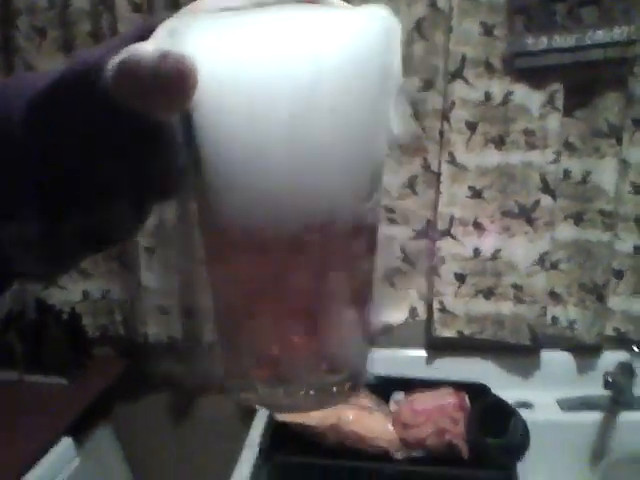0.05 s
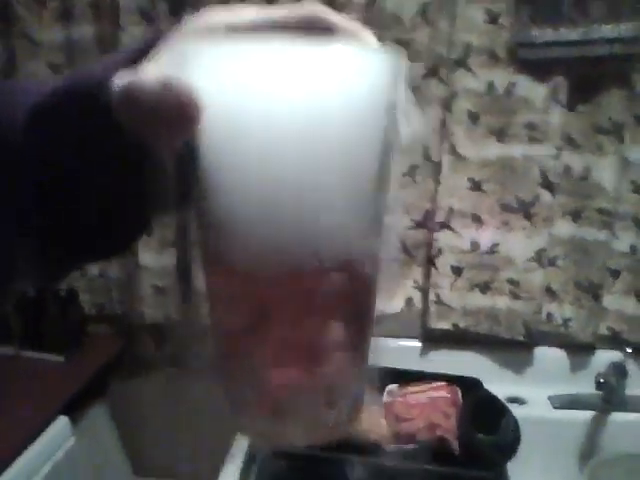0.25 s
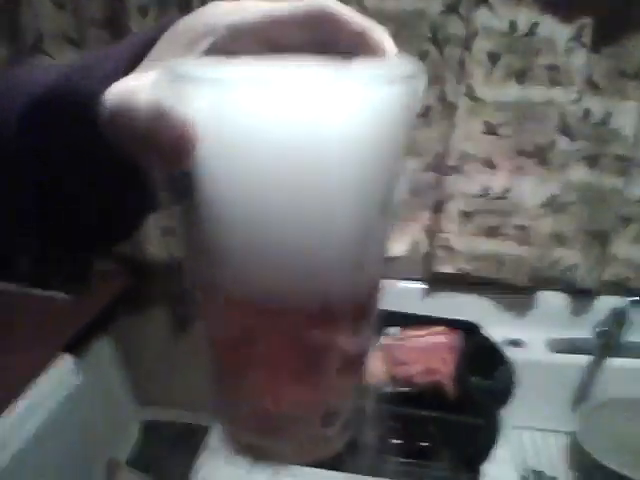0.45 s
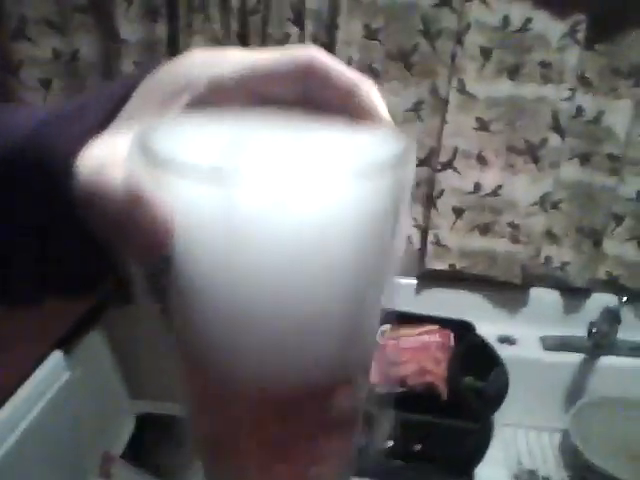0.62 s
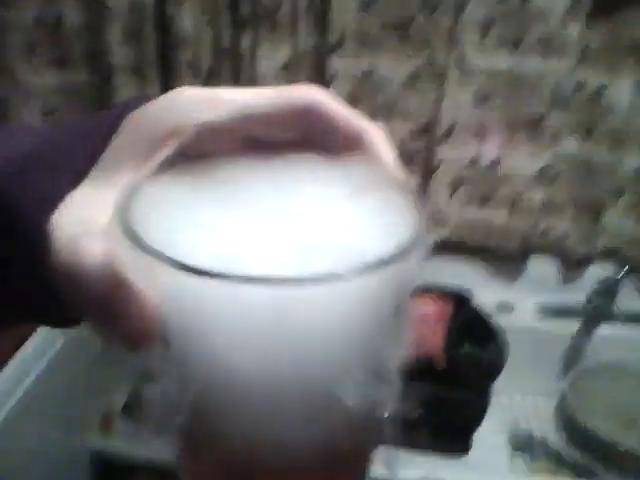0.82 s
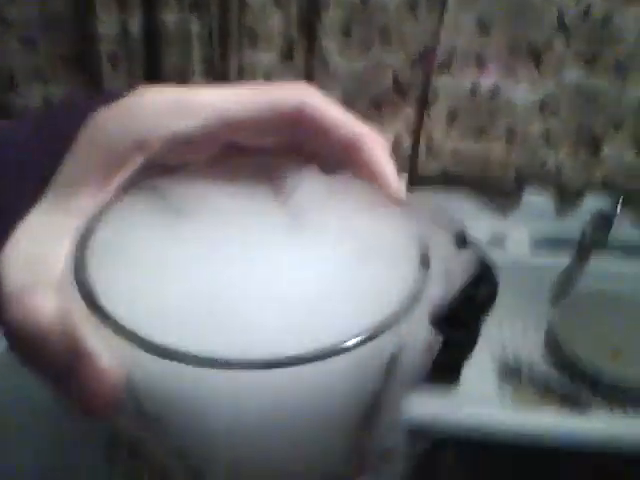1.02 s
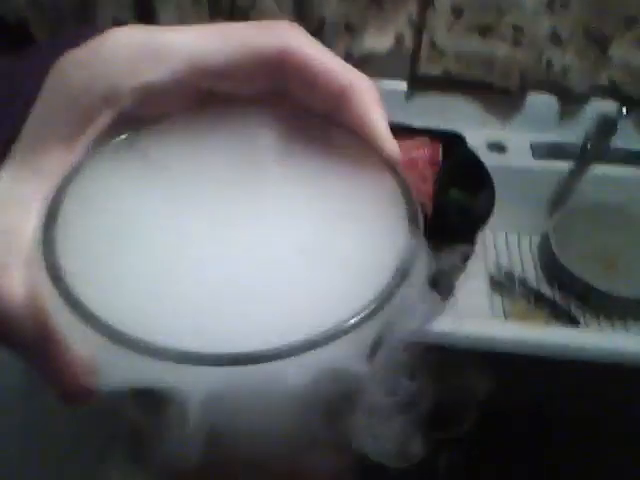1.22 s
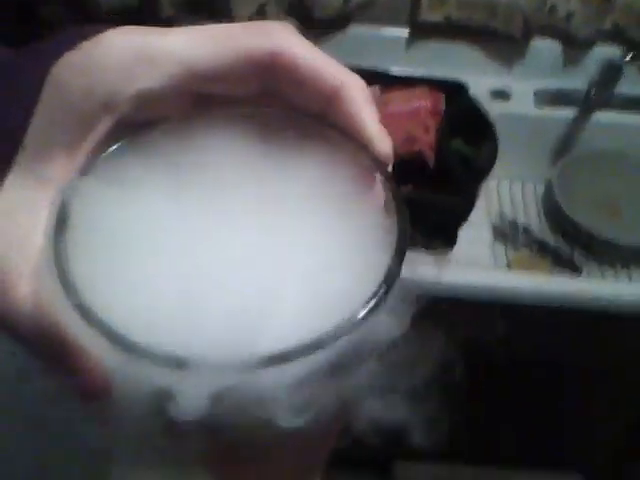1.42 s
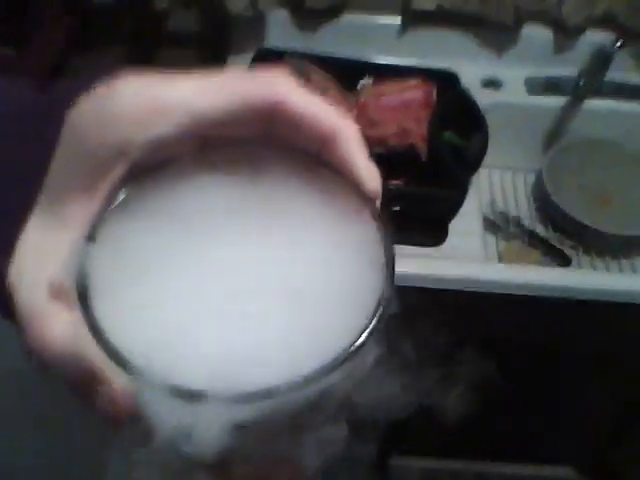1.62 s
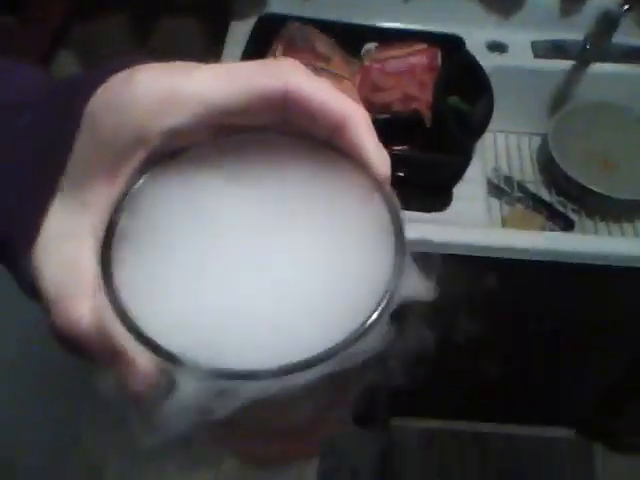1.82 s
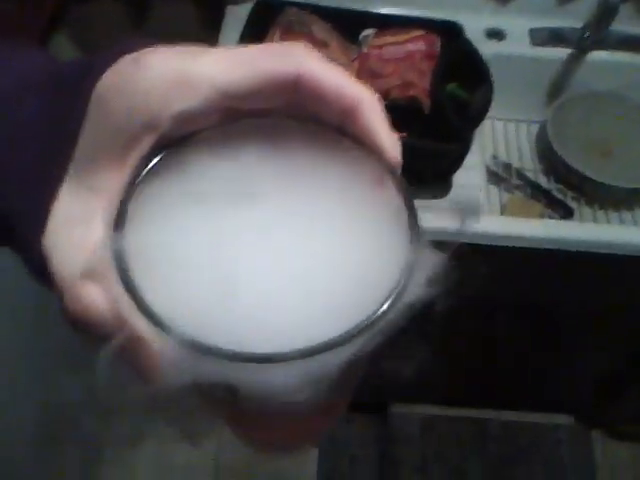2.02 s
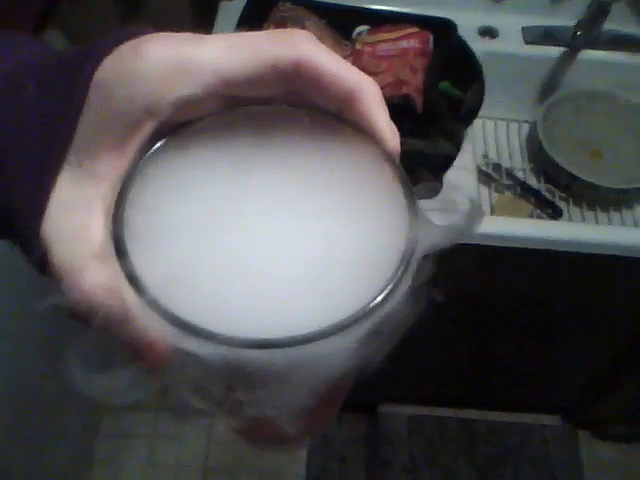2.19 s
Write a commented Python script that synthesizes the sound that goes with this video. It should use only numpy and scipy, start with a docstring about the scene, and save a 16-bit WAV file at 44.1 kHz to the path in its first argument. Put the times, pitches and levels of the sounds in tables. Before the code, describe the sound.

A drink bubbles steadily with dry ice, heard close up in a quiet kitchen. A sharp knock sounds right at the start, then a few light ticks, while soft plops and fine fizzing continue over faint hiss and hum.

```python
"""Dry ice bubbling in a glass.

In a hand-held drink, gas bubbles ring and rise in pitch as they near the surface, and the air above
the drink rings along; tiny ones ping, pop and fizz. One sharp knock and a few light ticks sound
close by, over the mains hum and steady hiss of a kitchen."""
import sys
import numpy as np
from scipy import signal
from scipy.fft import rfft, irfft
from scipy.io import wavfile

SR = 44100
rng = np.random.default_rng(int(sys.argv[2]) if len(sys.argv) > 2 else 0)


def bounce(signal):
    """Save signal as a 16-bit WAV file at the path given by the first command-line argument."""
    frames = np.transpose(np.atleast_2d(signal))
    limited = np.clip(frames, -1, 1)
    pcm = np.round(limited * 32767).astype(np.int16)
    wavfile.write(sys.argv[1], SR, pcm)


N = 103635
TIME = np.arange(N) / SR


def from_db(db):
    """Decibels to gain."""
    return 10 ** (np.asarray(db) / 20)


def add(out, s, sound):
    """Mix a sound in at s seconds."""
    i = int(np.clip(s * SR, 0, N - 1))
    out[i:i + len(sound)] += sound[:N - i]


def noise(spectrum):
    """Noise of rms 1, coloured by an EQ curve (f/Hz, level/dB)."""
    hz, db = np.transpose(spectrum)
    bins = np.maximum(np.arange(N // 2 + 1) * SR / N, 1)
    eq = from_db(np.interp(np.log(bins), np.log(hz), db))
    x = irfft(rfft(rng.standard_normal(N)) * eq, N)
    return x / x.std()


AIR_HZ, AIR_T60_S = 735, 0.034   # the air column above the drink
WOBBLE_DEPTH, WOBBLE_HZ = 0.44, 170.9
CUTOFF_HZ = 15800

def bubble(db, hz, rise, length):
    """One bubble: a gliding sine that swells early and fades, shaken by the churning water."""
    t = np.arange(max(int(length * SR), 8)) / SR
    swell = np.abs(np.sin(np.pi * np.minimum(t / length, 1) ** 0.57)) ** 1.21
    pitch = np.minimum(hz * 2 ** (rise * t), CUTOFF_HZ)
    depth = WOBBLE_DEPTH * np.minimum((pitch / AIR_HZ) ** 2, 2)   # high bubbles shake more
    level_jitter, phase_jitter = (depth * np.interp(2 * WOBBLE_HZ * t, np.arange(32), row)
                                  for row in rng.standard_normal((2, 32)))
    shake = (1 + depth * level_jitter) / np.sqrt(1 + depth ** 4)
    phase = 2 * np.pi * (np.cumsum(pitch) / SR + rng.random())
    return from_db(db) * swell * shake * np.sin(phase + phase_jitter)


# Large bubble cues: t/s, level/dB, starting f/Hz, rise/(octaves per s), length/s
LARGE_BUBBLES = [ (0.063, -31, 649, 12.5, 0.023), (.138, -31, 683, 8, 0.02), (0.159, -40, 1340, 48, 0.013),
                 (0.441, -30, 750, 12, 0.011), (.467, -21.5, 601, 8.5, 0.023), (.484, -27, 644, -3.5, 0.03),
                 (0.61, -33.5, 656, 20, 0.011), (0.661, -27.5, 647, 15.5, 0.027),
                 (0.678, -40, 872, 31.5, 0.041), (0.696, -38, 1060, 41, 0.014), (.697, -30, 710, 4, 0.0066),
                 (0.735, -32, 664, 13.5, 0.033), (0.774, -38.5, 724, 53, 0.019),
                 (0.803, -27.5, 615, 17.5, 0.031), (0.863, -36, 726, 32, 0.036),
                 (.898, -24, 2370, 57, 0.0067), (0.898, -20.5, 738, 0, 0.018), (0.981, -24, 730, 20, 0.01),
                 (1.014, -28.5, 704, 70, 0.009), (1.017, -31, 595, 19, 0.031),
                 (1.057, -27.5, 550, 26, 0.008), (1.067, -29, 698, 5, 0.035),
                 (1.097, -33.5, 1148, 17, 0.016), (1.137, -29, 642, 40, 0.0094),
                 (1.193, -27, 585, 35, 0.019), (1.214, -27.5, 689, 3.5, 0.049),
                 (1.223, -31.5, 760, 23, 0.038), (1.308, -27, 665, 10, 0.014), (1.323, -27, 693, 10, 0.02),
                 (1.356, -25, 775, -12, 0.012), (1.368, -29.5, 1200, 44, 0.024),
                 (1.373, -22.5, 663.5, 10.5, 0.034), (1.382, -37.5, 860, 33, 0.028),
                 (1.46, -25.5, 676, 18, 0.02), (1.481, -31, 597, 20, 0.031),
                 (1.511, -40.5, 890, 33.5, 0.031), (1.536, -29.5, 679, 4, 0.03),
                 (1.574, -42, 836, 42.5, 0.03), (1.605, -26.5, 594, 44.5, 0.019),
                 (1.635, -33, 660, 16.5, 0.044), (1.668, -34, 870, 30, 0.022), (1.757, -28, 713, 0.5, .022),
                 (1.84, -34.5, 1290, 86, 0.0078), (1.86, -26, 673, 18.5, 0.023),
                 (1.971, -31.5, 836, 42, 0.014), (2.015, -23, 776, -8.5, 0.019),
                 (2.029, -32.5, 1310, 42, 0.0073), (2.030, -22.5, 738, 3, 0.027),
                 (2.078, -23, 697, 13.5, 0.018), (2.1178, -30.5, 635, -19, 0.0097),
                 (2.124, -30.5, 677, 15.5, 0.024), (2.174, -29, 623, 22.5, 0.024),
                 (2.2145, -29, 663, 15, 0.016), (2.216, -35, 838, 43.5, 0.032),
                 (2.277, -32.5, 602, 12.5, 0.062)]

def large_bubbles():
    """Clear plops and whoops: big bubbles ring, most bending upward as they near the surface."""
    out = np.zeros(N)
    for s, db, hz, rise, length in LARGE_BUBBLES:
        add(out, s, bubble(db, hz, rise, length))
    return out


# Vigour of the boil, a fader ride on the gurgle and fizz: t/s, level/dB
BOIL_VIGOUR = [(0, -4), (.35, -3.5), (.7, -1.5), (1.3, -1), (1.75, -3), (2.35, -3.5)]

def boil(per_s):
    """Bubbles break off at uneven times: rows of t/s, vigour/dB and three normal random values."""
    starts = np.cumsum(rng.gamma(2, .5, size=3500)) / per_s
    vigour = np.interp(starts, *np.transpose(BOIL_VIGOUR))
    rows = np.column_stack([starts, vigour, rng.standard_normal((len(starts), 3))])
    return rows[starts < N / SR]


def gurgle():
    """Weaker bubbles sweep up through the resonance of the air in the glass."""
    direct = np.zeros(N)
    for s, vigour, size, pitch, speed in boil(per_s=75):
        db = -40 + vigour + 6 * min(size, 1)
        hz = 622.3 * 2 ** (0.295 * pitch)
        haste = 2 ** (speed / 2)
        add(direct, s, bubble(db, hz, rise=23.4 * haste, length=0.031 / haste))
    r, w = from_db(-60 / (AIR_T60_S * SR)), 2 * np.pi * AIR_HZ / SR
    bandpass = np.array([1, 0, -1]) * (1 - r * r) / 2, [1, -2 * r * np.cos(w), r * r]
    air = signal.lfilter(*bandpass, direct + 1e-18)
    return from_db(-4.5) * direct + from_db(1) * air


# Tiny bubbles with a clear pitch: t/s, level/dB, starting f/Hz
PINGS = [(.119, -36.5, 1810), (.368, -37, 4450), (.732, -45.5, 2730), (1.378, -32.5, 2740),
         (2.038, -28, 2970), (2.133, -33, 9530), (2.232, -31, 3980)]
PING_CYCLES, FIZZ_CYCLES = 11.9, 3.86

def fizz():
    """Tiny bubbles ring for a few cycles: some clear pings on a bed of faint ones."""
    out = np.zeros(N)
    for s, db, hz in PINGS:
        add(out, s, bubble(db, hz, rise=51, length=PING_CYCLES / hz))
    for s, vigour, size, pitch, stretch in boil(per_s=1100):
        db = -54 + vigour + 4 * min(size, 2)
        hz = 2397 * 2 ** (0.763 * pitch)
        add(out, s, bubble(db, hz, rise=51, length=FIZZ_CYCLES / hz * 2 ** (stretch / 2)))
    return out


# Spurts of gas crackling at the surface: centre t/s, rms level/dB, half length/s
GAS_SPURTS = [(0.196, -47, 0.037), (0.786, -44.5, 0.0066), (0.899, -38, 0.0017), (1.146, -44.5, 0.0065),
              (1.243, -41, 0.003), (1.373, -44.5, 0.0066), (1.543, -47.5, 0.015), (2.039, -49.5, 0.013),
              (2.108, -50, 0.008), (2.333, -48, 0.021)]
# Single bubbles bursting: t/s, strike level/dB
POPS = [(0.1758, -39), (.791, -48), (.886, -44.5), (1.368, -47), (1.712, -37.5), (1.844, -40), (1.889, -38),
        (2.105, -45.5), (2.12, -41), (2.1325, -40.5), (2.176, -46.5), (2.232, -44), (2.346, -40)]
# Upper resonances of the air in the glass: f/Hz, relative level/dB, t60/s
AIR_MODES = [(1540, -3, 0.016), (2663, 1.5, 0.012), (3290, 2, 0.0082), (5270, -2.5, 0.0029)]
CRACKLE_PER_S, STRIKE_SCATTER_DB = 600, 3.5

def surface_bursts():
    """Single pops and spurts of little bursts ring the air in the glass, each with its own colour."""
    spurts = sum(from_db(db) * np.exp(-((TIME - s) / half) ** 2) for s, db, half in GAS_SPURTS)
    bursts = rng.random(N) < CRACKLE_PER_S / SR
    pops = np.zeros(N)
    for s, db in POPS:
        add(pops, s, from_db([db]))
    rings = np.zeros((2, N))
    for k, (hz, db, t60) in enumerate(AIR_MODES):
        r, w = from_db(-60 / (t60 * SR)), 2 * np.pi * hz / SR
        strikes = np.array([bursts, pops]) * from_db(db + STRIKE_SCATTER_DB * rng.standard_normal(N))
        resonator = [0, np.sin(w)], [1, -2 * r * np.cos(w), r * r]
        rings += (-1) ** k * signal.lfilter(*resonator, strikes + 1e-18)
    crackling, popping = rings
    return spurts * crackling / crackling.std() + popping


# Thin bubble films snapping: t/s, peak level/dB
FILM_SNAPS = [(0.771, -34), (0.884, -31), (1.197, -40), (1.2885, -32), (2.102, -31.5), (2.257, -35),
              (2.3465, -37)]
SNAP_HIGHPASS_HZ, SNAP_T60_S = 4530, 0.0044

def film_snaps():
    """A film that tears gives a very short, bright tick."""
    out, t = np.zeros(N), TIME[:SR // 20]
    highpass = signal.butter(1, SNAP_HIGHPASS_HZ, "high", fs=SR, output="sos")
    for s, db in FILM_SNAPS:
        tick = signal.sosfilt(highpass, rng.standard_normal(len(t)) * from_db(-60 * t / SNAP_T60_S))
        add(out, s, from_db(db) * tick / np.abs(tick).max())
    return out


# One sharp knock among light ticks: t/s, strike level/dB
KNOCKS = [(0.2099, -21.5), (0.2168, 5), (0.2217, -23), (.2340, -27), (0.2547, -24.5), (.3925, -37),
          (0.4797, -31.5), (0.4954, -27.5), (0.763, -35.5)]
# The body of each knock: f/Hz, relative level/dB, t60/s
KNOCK_MODES = [(155, -36.5, 0.019), (960, -23, 0.027), (1354, -4, 0.0066), (2320, 3.5, 0.006),
               (3210, -13.5, 0.017), (3900, -6, 0.0034), (6020, 1.5, 0.0021), (9200, -3.5, 0.0021),
               (12700, -6, 0.0021)]
CONTACT_HZ, CONTACT_DB_PER_OCTAVE = 2510, 7.5   # low-pass corner at 0 dB; extra level that halves it

def knocks():
    """Short contacts excite heavily damped modes; heavier contacts are duller."""
    out, t = np.zeros(N), TIME[:SR // 20]
    ring = sum((-1) ** k * from_db(db - 60 * t / t60) * np.sin(2 * np.pi * hz * t)
               for k, (hz, db, t60) in enumerate(KNOCK_MODES))
    for s, db in KNOCKS:
        corner_hz = CONTACT_HZ * 2 ** (-db / CONTACT_DB_PER_OCTAVE)
        pole = np.exp(-2 * np.pi * corner_hz / SR)
        add(out, s, from_db(db) * signal.lfilter([1 - pole], [1, -pole], ring))
    return out


# Colour of the friction noise: f/Hz, relative level/dB
SCRAPE_EQ = [(600, 2), (2000, 14), (6500, -5), (10000, -21)]

def scrape(centre_s=0.215, half_length_s=0.0077):
    """A short swell of friction leads into the sharp knock."""
    swell = np.exp(-((TIME - centre_s) / half_length_s) ** 2)
    return from_db(-29.5) * swell * noise(SCRAPE_EQ)


# Steady hum tones: f/Hz, rms level/dB
HUM_TONES = [(59.2, -67.5), (204.6, -65.5), (410, -64), (540, -54)]
# Fader ride on the low buzz: t/s, rms level/dB
BUZZ_RIDE = [(0, -58), (.3, -62.5), (.9, -67.5), (1.12, -56), (1.4, -66.5), (1.97, -65), (2.01, -46.5),
             (2.18, -63.5), (2.35, -55)]
# Colour of the hiss: f/Hz, relative level/dB
HISS_EQ = [(25, -39), (50, -18.5), (85, -25), (200, -17.5), (330, -21), (700, -8), (1300, -25.5),
           (2200, -32.5), (4400, -36.5), (8000, -36.5), (16000, -38.5)]

def room_tone(buzz_hz=116.8):
    """The kitchen's bed: steady hiss, mains hum and a low buzz that wavers in level."""
    hum = sum(from_db(db) * np.sin(2 * np.pi * (hz * TIME + rng.random())) for hz, db in HUM_TONES)
    buzz_level = from_db(np.interp(TIME, *np.transpose(BUZZ_RIDE)))
    buzz = buzz_level * np.sin(2 * np.pi * buzz_hz * TIME)
    return from_db(-46.5) * noise(HISS_EQ) + np.sqrt(2) * (hum + buzz)


def kitchen_reverb(x, t60_s=0.093):
    """Reflections blur into a short, diffuse tail of unit energy."""
    t = TIME[:SR // 2]
    tail = rng.standard_normal(len(t)) * from_db(-60 * t / t60_s)
    return signal.fftconvolve(x, tail / np.linalg.norm(tail))[:N]


def scene():
    """Mono mix: the drink with a little room around it; the knocks stay close and dry."""
    bed = room_tone()
    handling = knocks() + scrape()
    drink = surface_bursts() + film_snaps() + large_bubbles() + gurgle() + fizz()
    return (drink + from_db(-11.5) * kitchen_reverb(drink) + handling + bed)[None]


def record(dry):
    """A hard clip catches the loudest knock, then a steep low-pass trims the top."""
    lowpass = signal.cheby1(12, .1, CUTOFF_HZ, fs=SR, output="sos")
    return signal.sosfilt(lowpass, np.clip(dry, -1, 1))


dry = scene()
out = record(dry)
bounce(out)
```